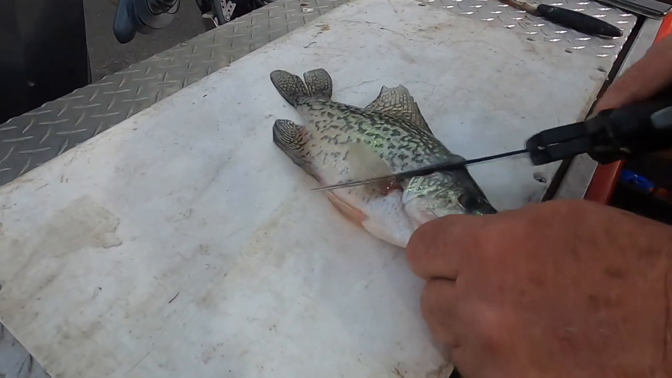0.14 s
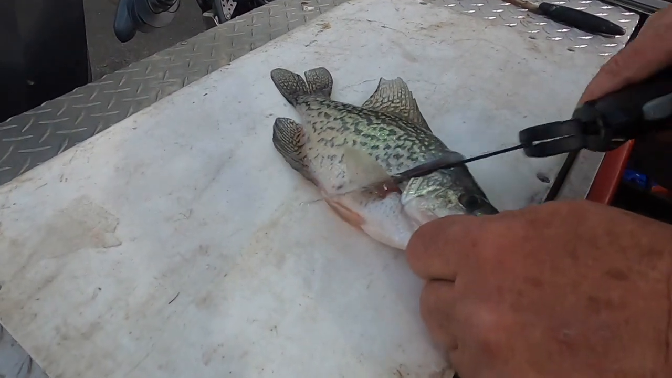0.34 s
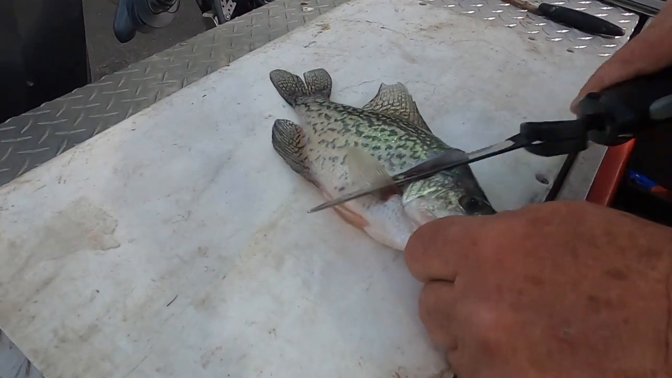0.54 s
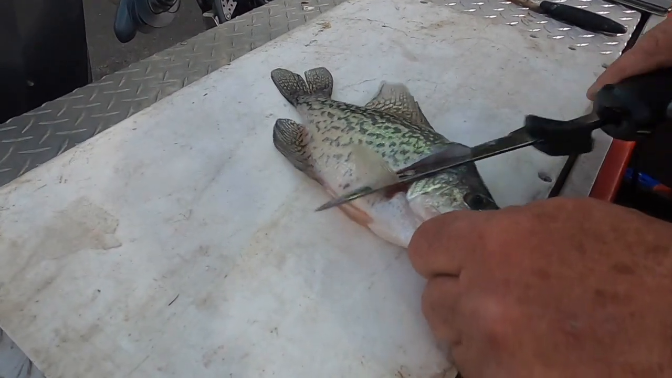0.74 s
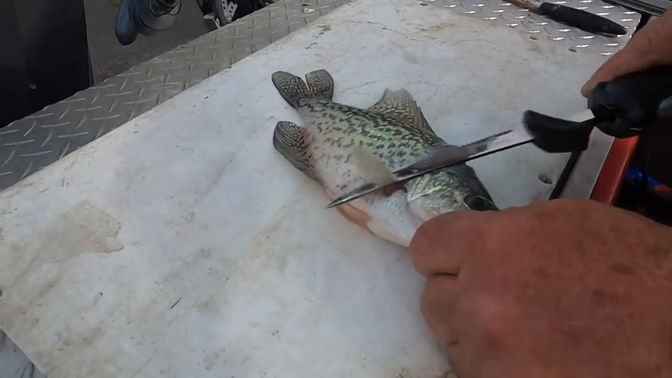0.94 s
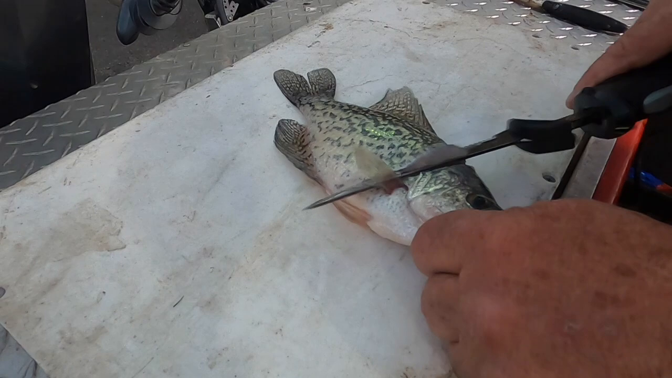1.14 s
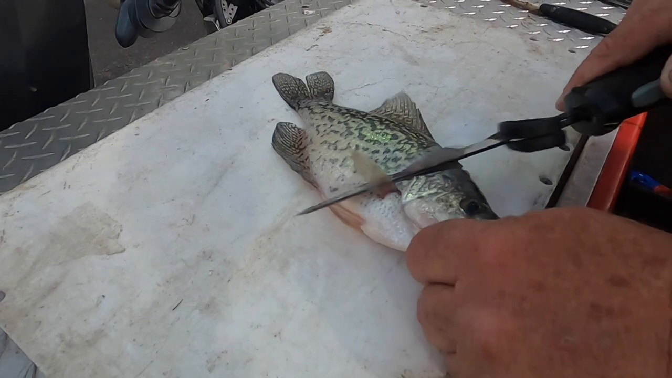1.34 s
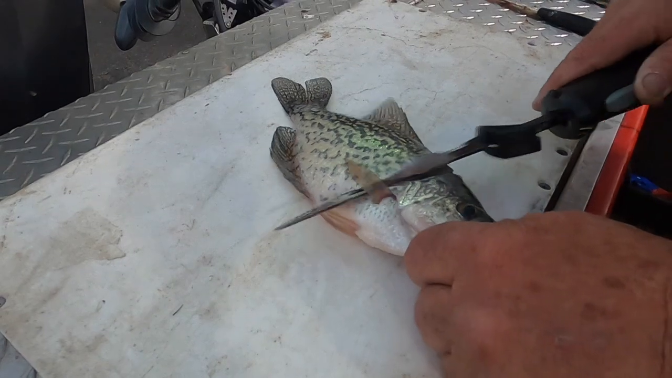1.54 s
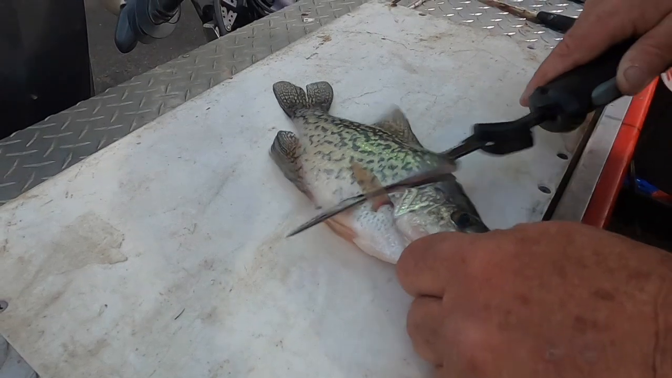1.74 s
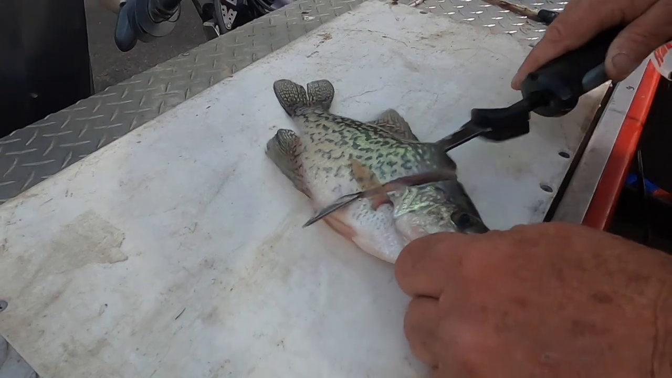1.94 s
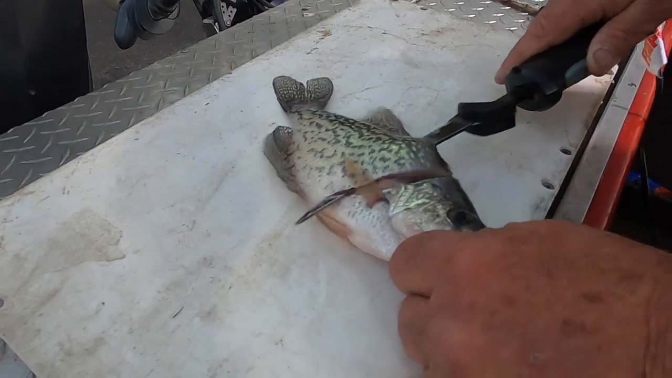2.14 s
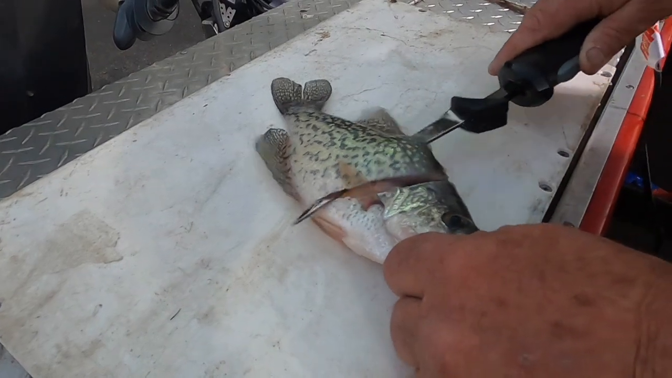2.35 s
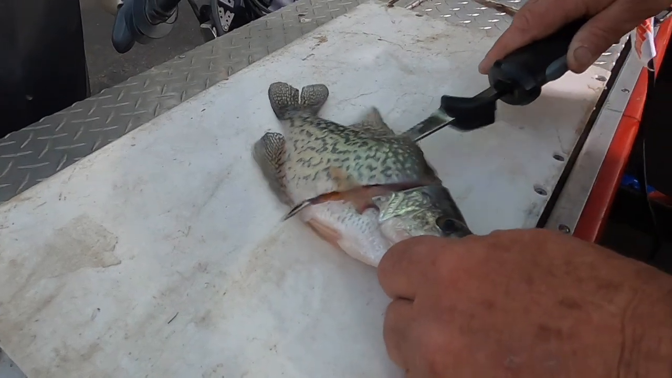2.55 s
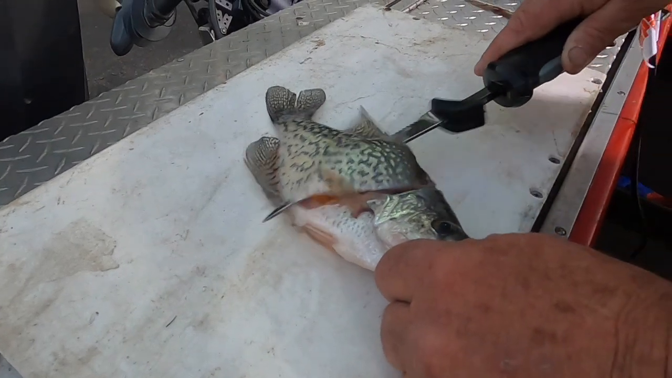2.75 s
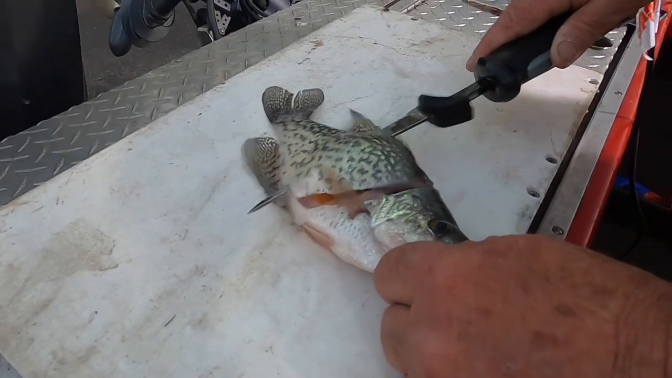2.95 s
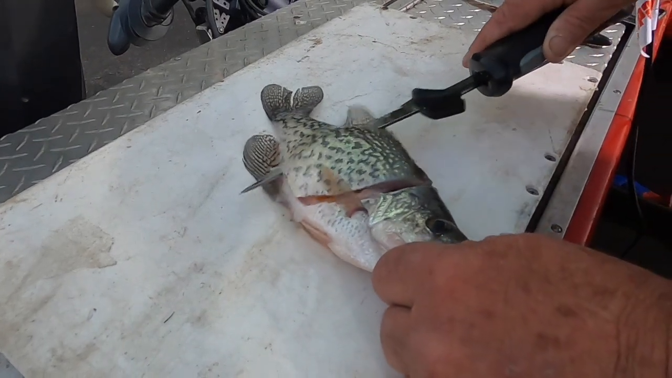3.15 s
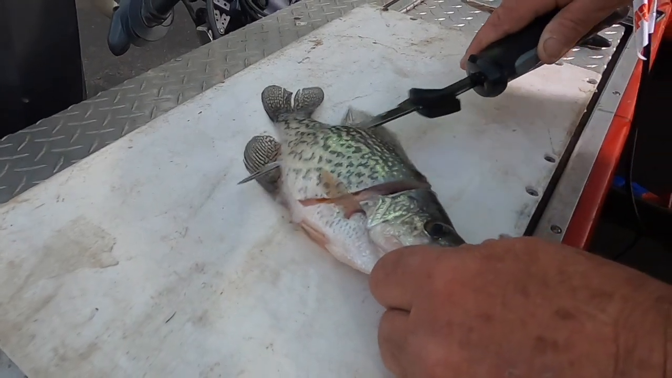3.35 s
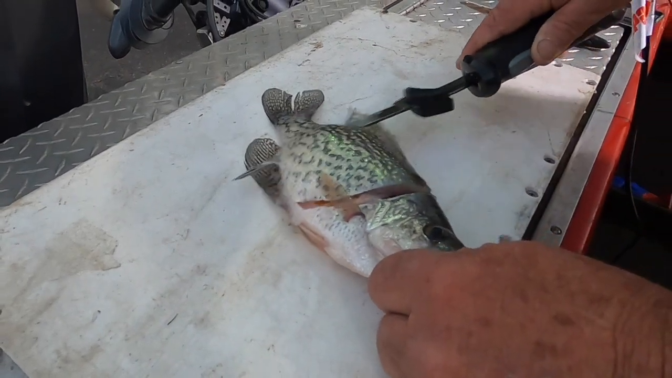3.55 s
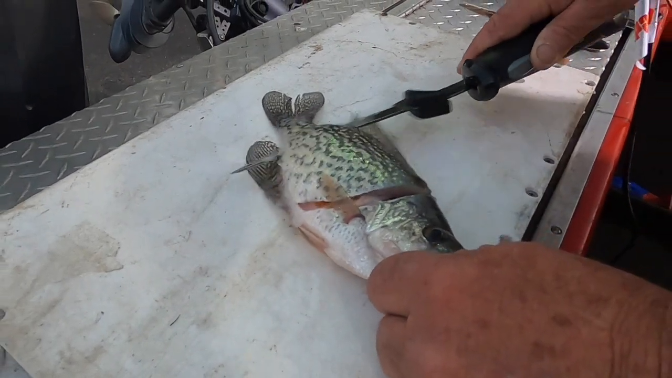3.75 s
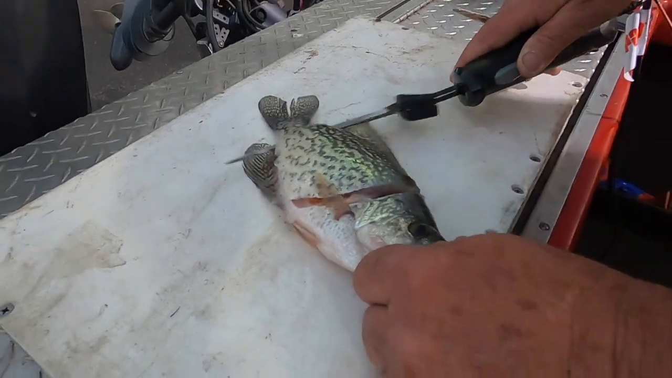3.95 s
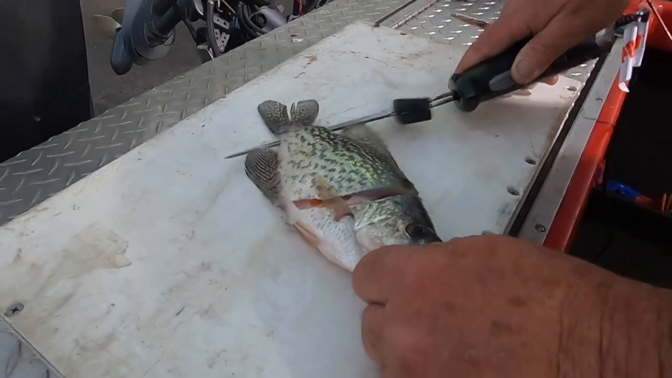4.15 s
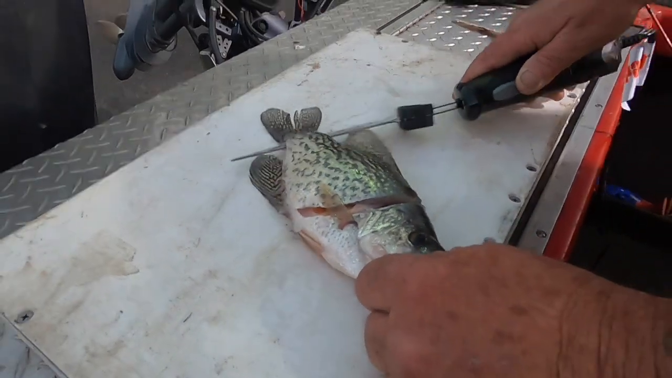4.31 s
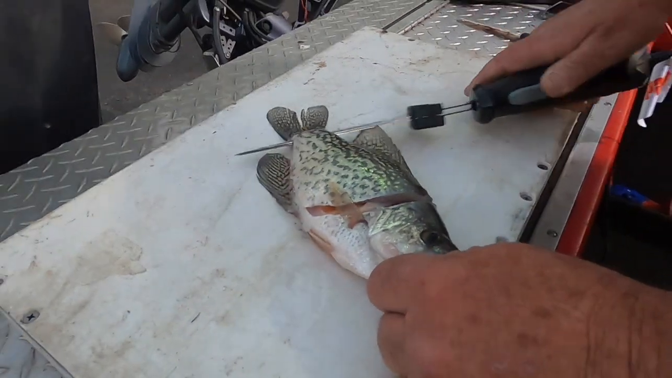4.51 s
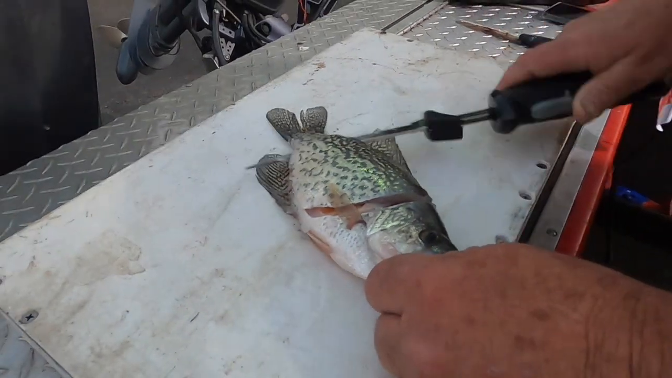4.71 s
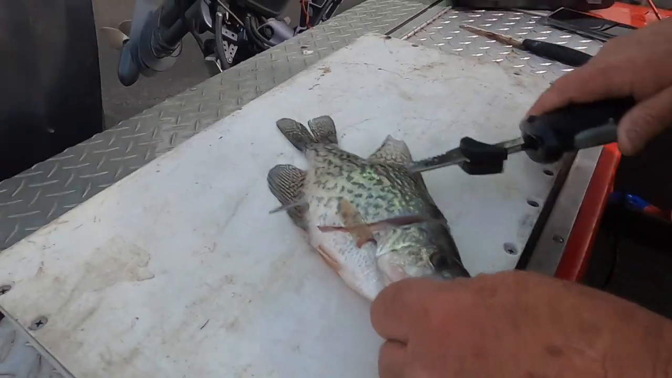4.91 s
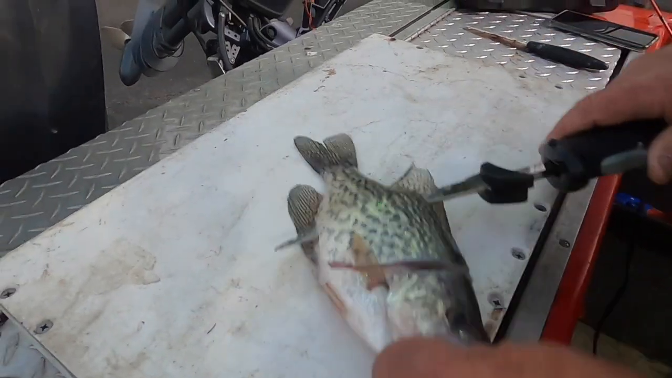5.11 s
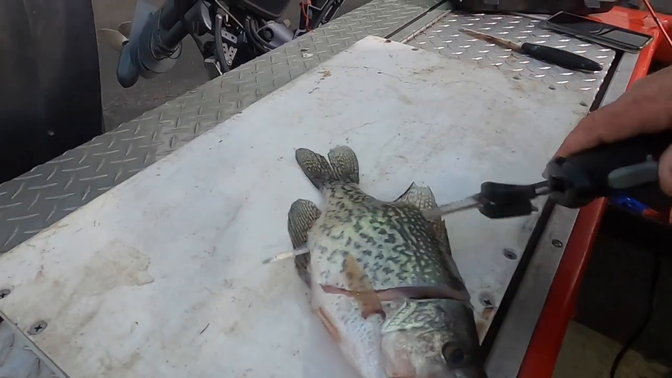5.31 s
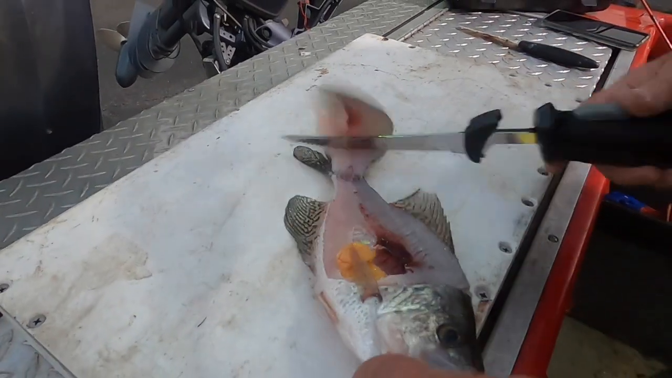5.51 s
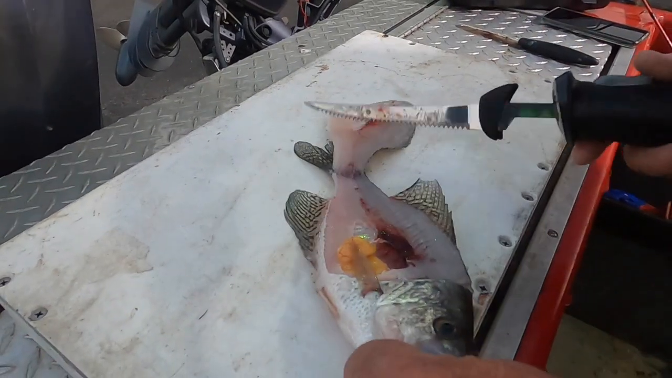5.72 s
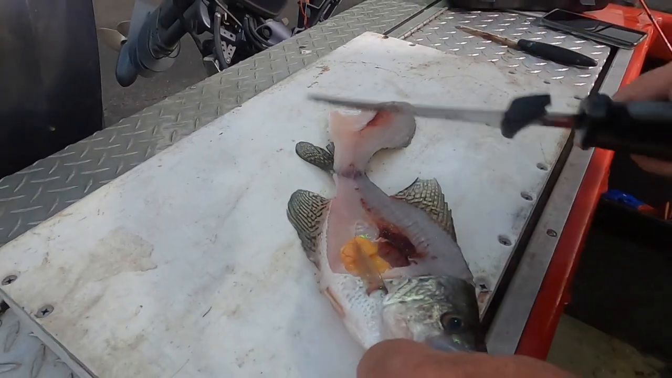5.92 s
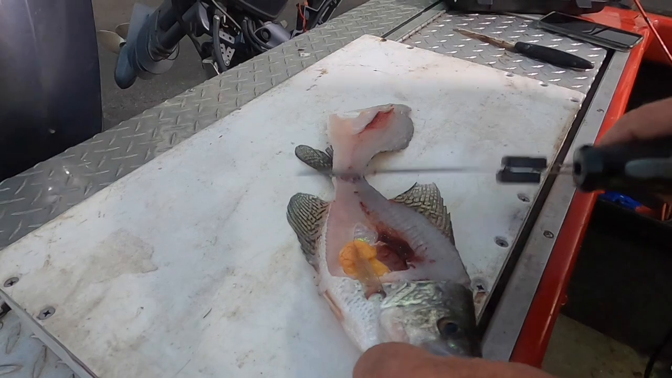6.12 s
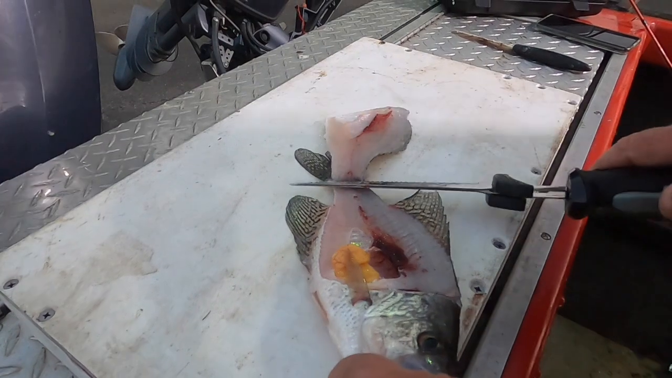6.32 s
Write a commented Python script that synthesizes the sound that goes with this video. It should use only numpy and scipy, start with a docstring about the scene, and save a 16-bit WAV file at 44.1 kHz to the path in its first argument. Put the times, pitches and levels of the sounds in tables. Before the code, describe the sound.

Close, rattling motor-knife buzz sawing flesh with small bony crunches, coasting down in pitch, then a wet flop and dull thumps on a board.

```python
"""A hard, buzzing clatter close by: an electric fillet knife saws along a fish on a plastic board on a boat deck.
A small motor cranks two serrated blades; noise pulsed at each reversal rings blades, flesh and board.
The trigger is let go and the motor coasts down in an even ramp of speed.
The fillet then flops over in wet crackles, and the fish is shifted with knocks and a rumble of board modes.
Low outdoor rumble lies underneath."""
import sys
import numpy as np
from scipy import signal
from scipy.fft import rfft, irfft, next_fast_len
from scipy.io import wavfile
from scipy.ndimage import uniform_filter1d

SR = 44100
rng = np.random.default_rng(int(sys.argv[2]) if len(sys.argv) > 2 else 0)


def transcribe(u):
    """Save the signal u as a 16-bit wav file named by the first command-line argument.

    u: samples, shape (n,) or (channels, n), limited to [-1, 1]; the rate is SR.
    q: integer samples, one column per channel.
    """
    v = np.clip(np.atleast_2d(u).T, -1, 1)
    q = np.round(v * 32767).astype(np.int16)
    wavfile.write(sys.argv[1], SR, q)


N = 280917
TIME = np.arange(N) / SR
FFT_SIZE = next_fast_len(N + SR // 4)
BIN_HZ = np.maximum(np.fft.rfftfreq(FFT_SIZE, 1 / SR), 1)

RELEASE_S, REST_S = 4.55, 5.41  # trigger let go, crank at rest
GEAR_RATIO = 25 / 3  # shaft turns per crank turn

# Crank under power. Each row: time in seconds, blade strokes per second.
POWERED_SPEED = [(0.0, 35.27), (0.52, 34.99), (0.7, 35.59), (0.88, 35.07), (1.4, 34.91), (1.92, 34.25),
                 (2.28, 34.73), (2.97, 34.33), (3.15, 34.49), (3.85, 34.6), (4.2, 34.63), (4.55, 35.1)]
# Ribs breaking. Each row: time in seconds, surge of the work in dB, relative knock in dB.
RIBS = [(1.647, -0.5, -24), (1.759, 0, -23), (1.829, -1.5, -26), (1.948, 5, -38), (2.08, 4.5, -30),
        (2.282, 1.5, -33), (2.389, 1, -22.5), (2.55, 2.5, -24), (2.679, -0.5, -20), (2.95, 0, -19),
        (3.03, -1, -22), (3.351, -1.5, -25), (4.342, 2, -24), (4.398, -3.5, -20)]
# Resonances of blades and housing. Each row: centre in Hz, width in Hz, relative level in dB in the first cut,
# the same along the backbone.
KNIFE_MODES = [(897, 87, 5, 7), (1100, 690, -7.5, -9), (1366, 240, -9, -18), (1820, 107, -1.5, 0.5),
               (2450, 260, -11.5, -6.5), (2930, 116, -1.5, -6), (3874, 220, -11, 0.5), (4920, 176, -4.5, 3)]
# Knife colour along the backbone. Each row: frequency in Hz, relative density in dB per Hz.
BACKBONE_COLOUR = [(450, -23.5), (700, -7), (1000, -6), (1400, -3), (1620, -9), (2150, -7), (2700, -1.5),
                   (3600, -4.5), (4500, -7), (6100, -5.5), (8700, -16), (11500, -26.5), (13800, -32),
                   (15500, -42.5)]
# The board on its stand. Each row: frequency in Hz, relative level in dB, t60 in seconds.
BOARD_MODES = [(47, -24, 0.21), (54, 4, 0.3), (72, -9, 0.35), (125, 0, 0.15), (224.6, -5, 0.17),
               (326, -24, 0.099), (504, -22, 0.058), (590, -18, 0.11)]


def from_db(db):
    """Decibels to gain."""
    return np.exp(np.asarray(db) * (np.log(10) / 20))


def rms_one(x):
    """Scale to rms 1."""
    return x / np.sqrt(np.mean(x ** 2) + 1e-20)


def steady(x):
    """Hold the rms near 1 over a few strokes, keeping the pulses."""
    local_power = np.abs(uniform_filter1d(x ** 2, size=4000))
    return x / np.sqrt(local_power + 1e-4 * np.mean(x ** 2))


def in_time(rows):
    """One curve over time for each column after the seconds."""
    s, *columns = np.transpose(rows)
    return [np.interp(TIME, s, c) for c in columns]


def gain_curve(points):
    """Gain at every FFT bin from (Hz, dB) points, linear in log frequency."""
    hz, db = np.transpose(points)
    return from_db(np.interp(np.log(BIN_HZ), np.log(hz), db))


def coloured(x, spectrum):
    """Causal minimum-phase filter, its phase found by folding the cepstrum."""
    cepstrum = irfft(np.log(gain_curve(spectrum)), FFT_SIZE)
    cepstrum[1:] *= 2 * (np.arange(1, FFT_SIZE) < FFT_SIZE / 2)
    return irfft(rfft(x, FFT_SIZE) * np.exp(rfft(cepstrum)), FFT_SIZE)[:N]


def band(x, low_hz, high_hz, order=3):
    """Butterworth band-pass."""
    edges_hz = [low_hz, min(high_hz, .49 * SR)]
    return signal.sosfilt(signal.butter(order, edges_hz, "band", fs=SR, output="sos"), x)


def resonance(x, hz, width_hz):
    """Two-pole resonance with gain 1 on top."""
    r = np.exp(-np.pi * width_hz / SR)
    zeros = np.array([1, 0, -1]) * (1 - r * r) / 2
    return signal.lfilter(zeros, [1, -2 * r * np.cos(2 * np.pi * hz / SR), r * r], x)


def gliding_resonance(x, hz, width_hz, order=2):
    """Resonance on a moving centre: shift down to 0 Hz, low-pass, shift back; gain 1 on top."""
    turn = np.exp(2j * np.pi * np.cumsum(hz) / SR)
    low_pass = signal.butter(order, width_hz / 2, fs=SR, output="sos")
    return 2 * np.real(turn * signal.sosfilt(low_pass, x * np.conj(turn)))


def drift(per_s):
    """Random curve with rms 1, straight between per_s new values a second."""
    return rms_one(np.interp(TIME * per_s, np.arange(N // 20), rng.standard_normal(N // 20)))


def grains(per_s, spread_db):
    """Random tiny contacts of uneven size and either sign; rms 1."""
    sizes = from_db(spread_db * np.minimum(rng.exponential(1, N), 3.5)) * rng.choice([-1, 1], N)
    return rms_one(sizes * (rng.random(N) < per_s / SR))


def bursts(rows):
    """Envelope of hits (s, dB, t60 s) that swell for 3.1 ms and die away exponentially."""
    out = np.zeros(N)
    for s, db, t60 in rows:
        near = slice(int((s - t60) * SR), int((s + 2 * t60) * SR))
        age = TIME[near] - s
        attack = np.clip(age / 0.0031 + 1, 0, 1)
        out[near] += from_db(db - 60 * np.maximum(age, 0) / t60) * attack
    return out + 1e-9


def swell(along):
    """Rise and fall of height 1 as along goes from 0 to 1; power 1 is a half sine, less is flatter."""
    return np.abs(np.sin(np.pi * along)) ** 0.21


def glides(x, rows, width_hz):
    """Each row (start s, end s, first Hz, last Hz, dB) is a resonance of x that swells, glides and fades."""
    out = np.zeros(N)
    for start, end, first, last, db in rows:
        during = (TIME > start) & (TIME < end)
        along = (TIME[during] - start) / (end - start)
        centre_hz = first + (last - first) * along
        tone = gliding_resonance(x[during], centre_hz, min(width_hz, first / 4))
        out[during] += from_db(db) * swell(along) * steady(tone)
    return out


def stroke_hum(orders, turns, waver_db, slip_turns=0.0056):
    """Harmonics (multiple, dB) of the stroke rate, wavering in level and phase."""
    angle = 2 * np.pi * (turns + slip_turns * drift(30))
    return np.sqrt(2) * sum(from_db(db + waver_db * drift(11)) * np.cos(k * angle + 2 * np.pi * rng.random())
                            for k, db in orders)


def open_air():
    """Noise shaped to a low outdoor rumble, with a faint narrow resonance ringing in it."""
    # Each row: frequency in Hz, relative density in dB per Hz.
    air_colour = [(13, -3.5), (22, -13.5), (70, 2), (102, -6.5), (168, -9.5), (202, -14), (333, -23),
                  (626, -24), (859, -27), (1030, -21.5), (2220, -40), (5890, -53), (6720, -57), (7870, -60),
                  (12000, -83), (15600, -101), (22000, -120)]
    # Each row: time in seconds, level of the ringing in dB.
    ring_level = [(5.45, -75), (5.9, -75), (6.2, -74), (6.3, -70)]
    rumble = from_db(-43.5) * rms_one(coloured(rng.standard_normal(N), air_colour))
    ringing = rms_one(resonance(rng.standard_normal(N), hz=2740, width_hz=60))
    return rumble + from_db(in_time(ring_level)[0]) * ringing


def dragging():
    """Fish and hand drag: stick-slip grains rumble in the board's modes, building up and dying away."""
    peak_s, peak_db, rise_db_per_s, fall_db_per_s = 6.13, -36, 66, 94
    slips = grains(per_s=1000, spread_db=2.0)
    rumble = sum(from_db(db) * rms_one(resonance(slips, hz, 4 / t60)) for hz, db, t60 in BOARD_MODES)
    drag_db = peak_db - np.maximum(rise_db_per_s * (peak_s - TIME), fall_db_per_s * (TIME - peak_s))
    return from_db(drag_db) * rms_one(band(rumble, 33, 1800, order=2))


def board():
    """Fish and hand knock: decaying sines of the board's modes, the higher ones weaker under a soft blow."""
    # Each row: time in seconds, blow in dB, hardness in Hz.
    thumps = [(5.646, -26, 45), (5.682, -35, 45), (5.958, -39, 200), (6.003, -38, 300), (6.033, -31.5, 250),
              (6.065, -31, 300), (6.107, -25.5, 300), (6.122, -26.5, 199), (6.151, -27, 300),
              (6.173, -26.5, 400), (6.232, -39, 350)]
    out = np.zeros(N)
    for s, blow_db, hard_hz in thumps:
        start = int(s * SR)
        age = TIME[:N - start]
        for hz, db, t60 in BOARD_MODES:
            softness = np.hypot(1, (hz / hard_hz) ** 2 / 2)
            out[start:] += from_db(blow_db + db - 60 * age / t60) * np.sin(2 * np.pi * hz * age) / softness
    return out


def wet_fish():
    """Slaps are dying crackles of wet skin that ring the board; skin also slides, squelches and ticks."""
    # Each row: time in seconds, relative level in dB, t60 in seconds.
    slap_hits = [(5.4896, -63, 0.05), (5.627, -32.5, 0.046), (5.634, -30, 0.15), (5.6845, -21, 0.024),
                 (5.690, -28.5, 0.068), (5.70, -44, 0.13), (5.7291, -37, 0.03), (5.7565, -44, 0.022),
                 (6.107, -44, 0.28), (6.172, -47, 0.12), (6.235, -49, .025), (6.248, -51, 0.028),
                 (6.3442, -47, .03)]
    # Each row: frequency in Hz, relative density in dB per Hz.
    slap_colour = [(120, -2), (280, 7), (540, 0), (1000, -1), (1400, -2), (3000, -2), (4500, -6.5),
                   (8000, -25), (15000, -46)]
    # Ring of the board. Each row: centre in Hz, width in Hz, level against the crackle in dB.
    slap_modes = [(582, 100, 10), (870, 130, 6.5)]
    # Each row: start in seconds, end in seconds, level in dB, squelch centre in Hz.
    skin_slides = [(5.463, 5.644, -74, 6000), (5.785, 5.92, -71, 4630), (6.075, 6.2, -71, 4500),
                   (6.218, 6.45, -64, 1870)]
    # Skin peeling apart. Each row: time in seconds, level in dB.
    peel_ticks = [(5.49, -63), (5.529, -70), (5.558, -57), (5.573, -57), (6.091, -66)]

    crackle = bursts(slap_hits) * rms_one(coloured(grains(per_s=9800, spread_db=4.0), slap_colour))
    slaps = crackle + sum(from_db(db) * resonance(crackle, hz, width) for hz, width, db in slap_modes)
    film = band(grains(per_s=4700, spread_db=9.0), 900, 9000, order=3)
    slides = glides(film, [(start, end, hz, hz, db) for start, end, db, hz in skin_slides], width_hz=2000)
    tick_noise = rms_one(band(rng.standard_normal(N), 3100, 8600, order=4))
    ticks = bursts([(s, db, .012) for s, db in peel_ticks]) * tick_noise
    return from_db(-9.0) * slaps + slides + ticks


def sunk():
    """How deep the blades are in the fish, 0 to 1, sinking evenly."""
    # Start and end of the sinking in seconds.
    sinking_s = [1.66, 2.82]
    return np.interp(TIME, sinking_s, [0, 1])


def crank_speed():
    """Strokes per second: nearly steady under power, then falling evenly to rest."""
    left = np.clip((REST_S - TIME) / (REST_S - RELEASE_S), 0, 1)
    return in_time(POWERED_SPEED)[0] * left


def halvings(speed):
    """How many times the speed has halved from its powered value, at most 4."""
    return -np.log2(np.maximum(speed / in_time(POWERED_SPEED)[0], 1 / 16))


def motor(speed, turns):
    """Shaft hum and whine on its high multiples fade as it slows; rough gear whirr is loudest once slack."""
    # Each row: time in seconds, base level of the whine in dB.
    whine_level = [(0, -34), (.6, -33.5), (1.3, -29.5), (2.0, -39.5), (3.6, -38.5)]
    # Each row: multiple of the shaft rate, relative level in dB in the first cut, the same along the backbone.
    whine_orders = [(9, -10, 0), (12, -6.5, -1.5), (21, -17, -15), (31, -24, -18), (36, -25, -27)]
    # Each row: time in seconds, base level of the whirr in dB.
    gear_level = [(4.57, -52), (4.65, -39.5), (4.77, -39.5), (4.88, -45), (5.07, -51), (5.2, -60),
                  (5.32, -76)]
    # Each row: multiple of the shaft rate, width in Hz, relative level in dB.
    gear_bands = [(18.8, 450, 0), (12.6, 500, -10), (25.5, 600, -10), (36, 700, -14)]
    hum_db, hum_loaded_db, gear_surge_db = -44, -1, 1.5
    hum_loss_db, whine_loss_db = 35, 29  # per halving of speed

    shaft = 2 * np.pi * GEAR_RATIO * turns + 0.067 * drift(90)
    loaded, slowed = np.interp(TIME, [1.6, 2.4], [0, 1]), halvings(speed)
    hum = from_db(hum_db + hum_loaded_db * loaded - hum_loss_db * slowed) * np.sin(shaft)

    whine_db = in_time(whine_level)[0] - whine_loss_db * slowed
    whine = sum(from_db(free_db + (load_db - free_db) * loaded + 1.85 * drift(80)) * np.sin(k * shaft)
                for k, free_db, load_db in whine_orders)

    lurch = 1 + .012 * drift(35)  # the crank drags unevenly
    whirr = np.zeros(N)
    for multiple, width_hz, db in gear_bands:
        centre_hz = multiple * GEAR_RATIO * speed * lurch
        rough = gliding_resonance(grains(per_s=2500, spread_db=1.5), centre_hz, width_hz)
        whirr += from_db(db + 1.9 * drift(25)) * steady(rough)
    reversal_db = gear_surge_db * np.cos(2 * np.pi * 2 * (turns - .25))
    whirr_db = in_time(gear_level)[0] + reversal_db + 4.4 * drift(70)
    return np.sqrt(2) * (hum + from_db(whine_db) * whine) + from_db(whirr_db) * whirr


def rib_surge_db():
    """Brief triangular change in the work as each rib gives way, in dB."""
    half_width_s = 0.042
    return sum(db * np.clip(1 - np.abs(TIME - s) / half_width_s, 0, 1) for s, db, _ in RIBS)


def rib_knocks():
    """Each rib that gives way jolts the fish against the board: an impulse in quickly damped modes."""
    # The fish bouncing. Each row: centre in Hz, width in Hz, relative level in dB.
    fish_modes = [(48, 12, -8), (102, 19, -6.5), (152, 27, -3.5), (255, 51, -10)]
    lead_s = .012  # ahead of the height of the surge
    jolts = np.zeros(N)
    for s, _, db in RIBS:
        jolts[int((s - lead_s) * SR)] = from_db(db)
    return sum(from_db(db) * resonance(jolts + 1e-18, hz, width) * SR / (2 * np.pi * width)
               for hz, width, db in fish_modes)


def tooth_contacts(turns, slop_s, count=40):
    """The same serrations meet on every crank turn, each a little early or late; rms 1."""
    angles = (np.arange(count) + rng.random(count)) / count
    cycle = np.arange(int(turns[-1]))[:, None]
    s = np.interp(cycle + angles, turns, TIME) + slop_s * rng.standard_normal((len(cycle), count))
    size_db = 0.94 * rng.standard_normal(s.shape) + 1.13 * rng.standard_normal(count)
    sizes = rng.choice([-1, 1], count) * from_db(size_db)
    samples = np.clip(s * SR, 0, N - 1).astype(int)
    return rms_one(np.bincount(samples.ravel(), sizes.ravel(), N))


def flesh(force, turns):
    """The blades shake the handle twice a turn, drum on the board through the fish and buzz along the backbone."""
    # Hand bearing down. Each row: time in seconds, handle shake in dB.
    pressure = [(0, -38), (.15, -43), (.5, -28.5), (.76, -42), (.86, -33.5), (1.17, -43.5), (1.42, -24.5),
                (1.55, -35), (1.7, -31.5), (2.55, -33.5), (3.15, -38.5), (3.4, -30.5), (4.55, -33.5),
                (4.72, -45), (4.87, -38), (4.97, -64)]
    # Each row: time in seconds, board drumming in dB, flesh knocking in dB.
    cutting = [(0, -44.5, -42), (.3, -27, -38.5), (.76, -45.5, -38), (1.45, -32, -34.5), (2.45, -32, -36),
               (2.95, -32, -34.5), (3.85, -26, -32), (4.15, -33, -32), (4.5, -32, -32), (4.68, -42, -48.5),
               (5.3, -70, -57)]
    # Lurch of the unequal reversals. Each row: multiple of the stroke rate, relative level in dB.
    lurch_order = [(3, 0)]
    # Shaken board. Each row: multiple of the stroke rate, relative level in dB.
    board_orders = [(4, -3), (5, -8), (6, -9)]
    # Flesh under the blades. Each row: multiple of the stroke rate, relative level in dB.
    flesh_orders = [(8, -6.5), (9, -14), (10, -9), (11, -17), (12, -8.5), (13, -18), (14, -10), (18, -17),
                    (20, -17)]
    # Blades along the backbone. Each row: multiple of the stroke rate, relative level in dB.
    buzz_orders = [(26, -3), (31, 0), (33, -2), (52, -4)]
    # Flesh moaning round the blades. Each row: start in seconds, end in seconds, first Hz, last Hz, level in dB.
    pockets = [(1.57, 2.73, 856, 1170, -40.5), (2.45, 3.35, 1270, 1350, -39),
               (4.017, 4.235, 455, 483, -30.5), (4.268, 4.42, 500, 480, -32),
               (4.05, 4.296, 172, 135, -30.5)]
    buzz_db, slack_s = -46.5, 0.089

    shake_db, = in_time(pressure)
    drum_db, knock_db = in_time(cutting)
    surge = from_db(rib_surge_db() + 1 * drift(12))  # uneven flesh makes the work waver
    buried = sunk()
    shake_turns = turns - 0.013 * (1 - buried)
    shake = from_db(shake_db + 1.2 * drift(15)) * np.sqrt(2) * np.cos(2 * np.pi * 2 * shake_turns)
    lurch_db = (shake_db + drum_db) / 2 - 5.5 - 4.7 * buried
    lurch = from_db(lurch_db) * stroke_hum(lurch_order, turns, waver_db=4.0)

    pulsed = np.abs(force) * rng.standard_normal(N)  # fresh noise that swells with the strokes
    hum = from_db(-9.5 + 1.5 * buried) * stroke_hum(board_orders, turns, waver_db=4)
    thud = from_db(-7.5) * steady(band(pulsed, 108, 200.5, order=3))
    thud += from_db(-11.5 - 3.7 * buried) * steady(band(pulsed, 24, 78))
    knocks = from_db(-4.0 - 2.1 * buried) * steady(band(pulsed, 287, 677))
    knocks += from_db(-10.0 + 6.6 * buried) * stroke_hum(flesh_orders, turns, waver_db=3.0)
    work = from_db(drum_db) * (hum + thud) + from_db(knock_db) * knocks

    driven = np.interp(TIME, [RELEASE_S, RELEASE_S + slack_s], [1, 0])
    buzz_hum = stroke_hum(buzz_orders, turns, waver_db=4, slip_turns=0.0041)
    buzz = from_db(buzz_db) * buried * driven * buzz_hum
    moans = glides(tooth_contacts(turns, slop_s=0.00016), pockets, width_hz=95)
    return shake + lurch + surge * work + buzz + moans


def halt():
    """A small click of band-passed noise as the blades near rest."""
    return bursts([(5.313, -52, .015)]) * rms_one(band(rng.standard_normal(N), 4800, 9000, order=2))


def catches():
    """Teeth snag on bone and scale: short bursts of grains ring the knife's modes."""
    # Each row: time in seconds, relative level in dB.
    catch_hits = [(2.095, -38), (2.827, -25.5), (2.94, -32), (4.485, -31.5), (4.817, -37), (4.879, -34),
                  (4.93, -41), (4.972, -36), (5.0, -40)]
    snags = bursts([(s, db, .05) for s, db in catch_hits]) * grains(per_s=8900, spread_db=1.5)
    rung = snags + sum(from_db(db) * resonance(snags, hz, width) for hz, width, _, db in KNIFE_MODES)
    return from_db(10.5) * band(coloured(rung, BACKBONE_COLOUR), 350, 9600, order=2)


def blade_force(speed, turns):
    """Teeth and grit rub all the way, hardest at the reversals; the pulsing flattens as the crank slows."""
    # Two reversals a turn. Each row: share of a turn, force at full speed in dB in the first cut,
    # the same along the backbone.
    stroke = [(.03, -3, -3), (.15, 0, 0), (.27, 4.5, 3), (.38, 1, 0), (.48, -2, -2.5), (.57, -2.5, -3),
              (.66, 4.5, 4), (.73, 5.5, 7.5), (.82, 1, 2), (.9, -1, -1)]
    # Loose grit against the regular teeth, in dB: at the surface, when buried.
    grit_db = (0.5, -0.5)
    angle, free_db, buried_db = np.transpose(stroke)
    free, buried = (np.interp(turns, angle, db, period=1) for db in (free_db, buried_db))
    slap_db = (free + (buried - free) * sunk()) * speed / speed.max()
    grit = from_db(np.interp(sunk(), [0, 1], grit_db)) * grains(per_s=12000, spread_db=2.5)
    rubbing = tooth_contacts(turns, slop_s=.0001) + grit
    chatter_db = 1.9 * drift(600)
    bite_db = 0.39 * drift(70)  # no two reversals bite equally hard
    return rubbing * from_db(slap_db + chatter_db + bite_db)


def blades(force, speed):
    """The force rings blades and housing; the colour shifts as the knife turns along the backbone."""
    # Each row: time in seconds, base level of the clatter in dB.
    clatter_level = [(0, -31), (.42, -29.5), (.68, -31), (1.0, -30), (2.3, -29), (3.3, -29), (3.9, -28.5),
                     (4.53, -29), (4.68, -36), (5.005, -43), (5.035, -46), (5.31, -51), (5.41, -69)]
    # Each row: frequency in Hz, relative density in dB per Hz.
    first_cut_colour = [(450, -4.5), (720, -1.5), (1000, -0.5), (1300, 0), (2050, -7.5), (2800, -3),
                        (3750, -6), (5400, -6), (7200, -11), (8600, -14.5), (11500, -28), (13800, -31.5),
                        (15500, -40)]
    # Passing rings of blades and housing, in the cut and while coasting. Each row: start in seconds,
    # end in seconds, first Hz, last Hz, level in dB.
    passing_rings = [(-.4, 0.654, 1210, 1340, -37.5), (-.4, 0.585, 1630, 1610, -34.5),
                     (0.238, 0.355, 6950, 7040, -40.5), (.92, 2.0, 2750, 2600, -41),
                     (0, .75, 7700, 8100, -50), (0.753, 1.56, 8000, 9700, -47),
                     (1.102, 1.65, 2920, 2840, -41.5), (.75, 1.1, 5050, 5100, -38.5),
                     (1.5, 1.87, 5170, 5400, -34.5), (1.607, 1.873, 6440, 6660, -37.5),
                     (2.037, 2.502, 6600, 6540, -40), (2.3, 3.5, 8700, 8900, -47),
                     (3.903, 4.4, 6600, 6730, -41.5), (4.427, 4.646, 4900, 4900, -34.5),
                     (4.78, 4.825, 3100, 3000, -41), (4.858, 4.96, 3200, 3020, -40.5),
                     (4.863, 5.027, 5100, 4820, -42.5), (4.987, 5.018, 2750, 2850, -39),
                     (5.027, 5.156, 4870, 4200, -57)]
    rib_clatter_share = 0.43  # of each rib's surge in dB

    buried, slowed = sunk(), halvings(speed)
    flex = 1 + .012 * drift(7)  # the bending blades detune the modes
    grip_db = 2.0 * drift(5.2) - 4.5 * slowed  # flesh damps the modes unevenly; a slow crank barely rings them
    ringing = np.zeros(N)
    for hz, width_hz, free_db, buried_db in KNIFE_MODES:
        mode_gain = from_db(free_db) * (1 - buried) + from_db(buried_db) * buried
        ringing += mode_gain * gliding_resonance(force, hz * flex, width_hz, order=1)
    brushes = from_db(1.5) * band(rng.standard_normal(N), 9200, 19600, order=2)  # smooth hiss of the motor brushes
    rung = rms_one(force + from_db(grip_db) * ringing) + brushes
    first_cut = rms_one(coloured(rung, first_cut_colour))
    backbone = rms_one(coloured(rung, BACKBONE_COLOUR))
    sound = (1 - buried) * first_cut + buried * backbone

    clatter_db = in_time(clatter_level)[0] + rib_clatter_share * rib_surge_db()
    # body, ring, sizzle: low Hz, high Hz, dB at the surface, dB when buried, dB lost at the first halving of speed
    parts = [(534, 2125, -3.5, -1.8, 1.4), (2046, 5747, 0.16, 0.2, 0), (5690, 15400, -8, -9, 3.3)]
    clatter = np.zeros(N)
    for low_hz, high_hz, free_db, buried_db, loss_db in parts:
        part_db = free_db + (buried_db - free_db) * buried - loss_db * np.minimum(slowed, 1)
        clatter += from_db(clatter_db + part_db) * steady(band(sound, low_hz, high_hz, order=5))
    pulsed = np.abs(force) * rng.standard_normal(N)
    return clatter + glides(pulsed, passing_rings, width_hz=720)


def microphones(direct, scattered, lean, lag_s):
    """Direct sound reaches the left port late; scattered sound enters the two ports with opposite sign."""
    # Each row: frequency in Hz, left-right difference in dB at lean 1.
    lean_curve = [(80, 0), (250, -1.5), (1000, -2), (2400, -1.8), (4400, -2), (8000, -3.5), (14000, -11)]
    # Sound from all round. Each row: frequency in Hz, share in dB.
    scatter_curve = [(100, -27), (500, -20), (1000, -16), (2000, -12.5), (4000, -13), (8000, -4.5),
                     (13000, -2)]
    opposite = np.array([[1], [-1]])
    sides = gain_curve(lean_curve) ** (lean * opposite / 2)
    arrival = sides * np.exp(-1j * np.pi * BIN_HZ * lag_s * opposite)
    scatter = gain_curve(scatter_curve) * arrival * opposite
    centre = np.hypot(np.abs(arrival.mean(axis=0)), np.abs(scatter.mean(axis=0)))
    ports = rfft(direct, FFT_SIZE) * arrival + rfft(scattered, FFT_SIZE) * scatter
    return irfft(ports / centre, FFT_SIZE)[:, :N]


def scene():
    """Knife, fish and board in the open air."""
    table = wet_fish() + board() + dragging() + open_air()
    around = from_db(10.0) * (wet_fish() + open_air())

    speed = crank_speed()
    turns = np.cumsum(speed) / SR
    force, second_force = blade_force(speed, turns), blade_force(speed, turns)
    running = np.interp(TIME, [5.3, 5.45], [1, 0])
    knife = running * (blades(force, speed) + flesh(force, turns) + motor(speed, turns))
    knife += catches() + rib_knocks() + halt()
    # a second, independent run of rubbing and flesh noise, spread to both sides
    spread = running * (blades(second_force, speed) + flesh(second_force, turns))
    knife_pair = microphones(knife, spread, lean=0.97, lag_s=.000058)
    return knife_pair + microphones(table, around, lean=0.18, lag_s=.00004)


def record(dry):
    """Steep elliptic low-pass at 15.7 kHz, run both ways for zero phase."""
    return signal.sosfiltfilt(signal.ellip(10, .05, 70, 15700, fs=SR, output="sos"), dry)


dry = scene()
out = record(dry)
transcribe(out)
```